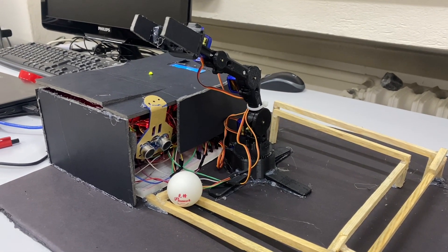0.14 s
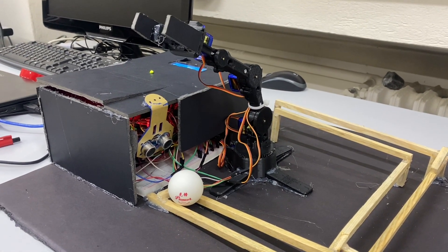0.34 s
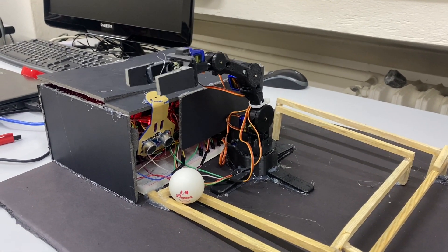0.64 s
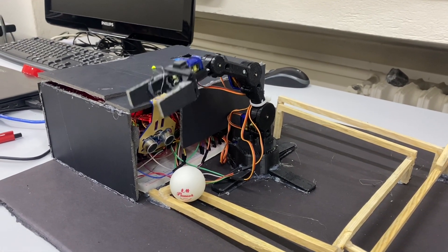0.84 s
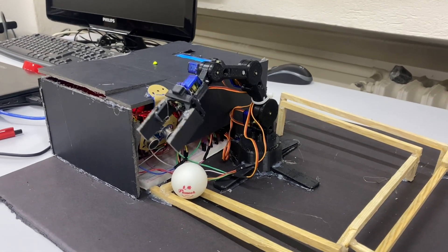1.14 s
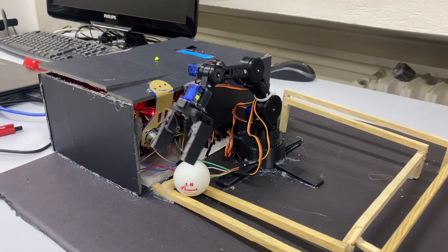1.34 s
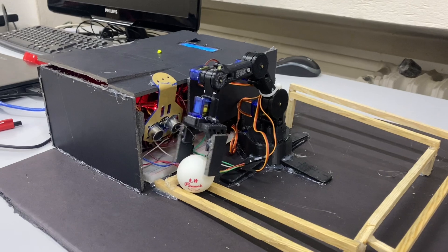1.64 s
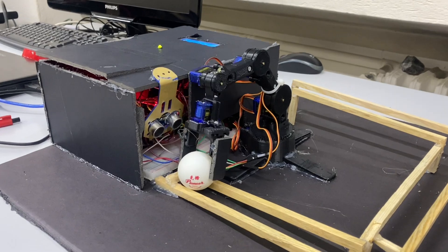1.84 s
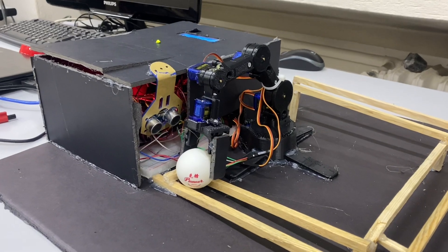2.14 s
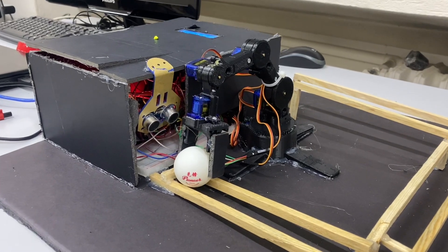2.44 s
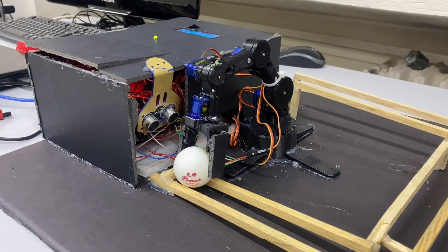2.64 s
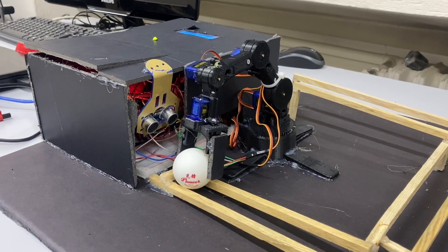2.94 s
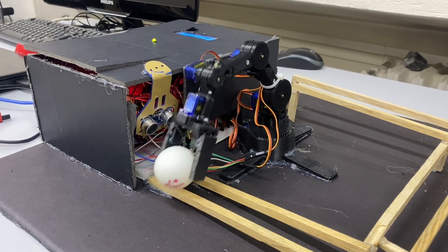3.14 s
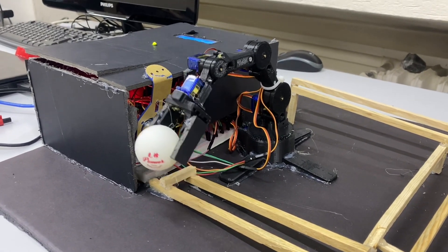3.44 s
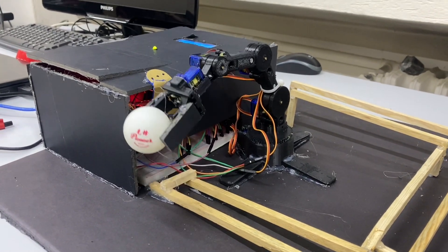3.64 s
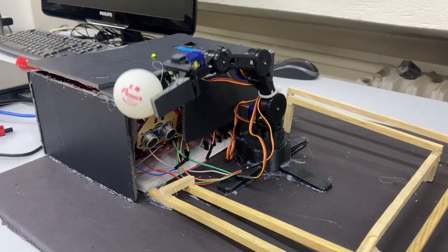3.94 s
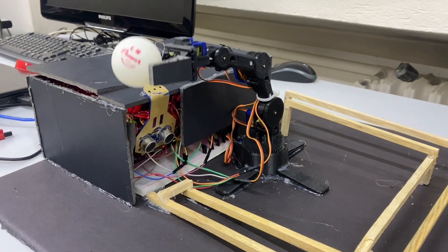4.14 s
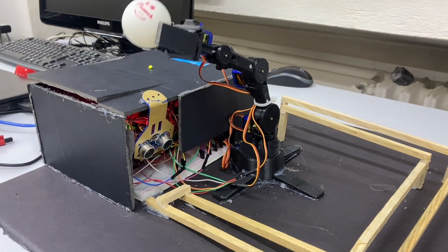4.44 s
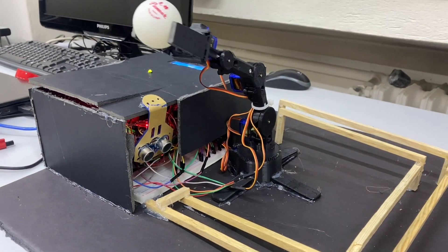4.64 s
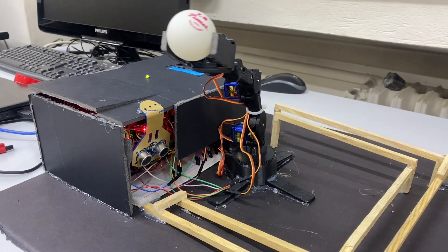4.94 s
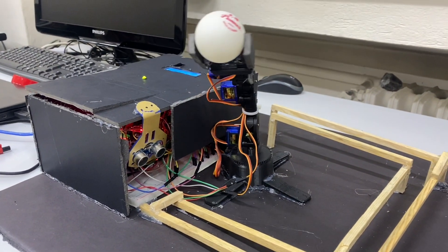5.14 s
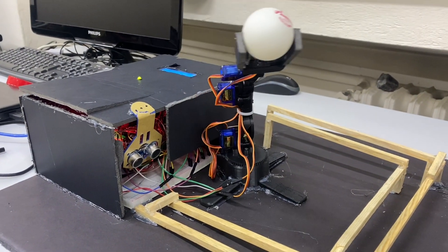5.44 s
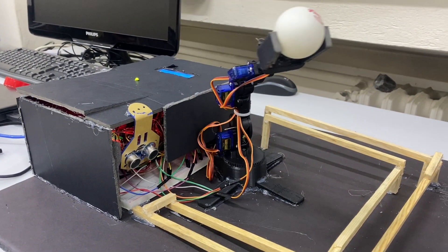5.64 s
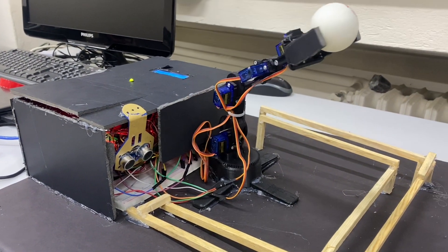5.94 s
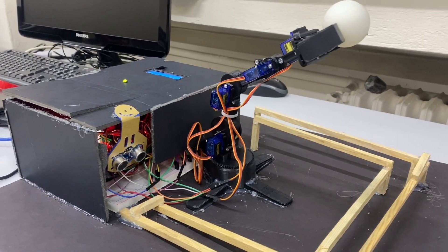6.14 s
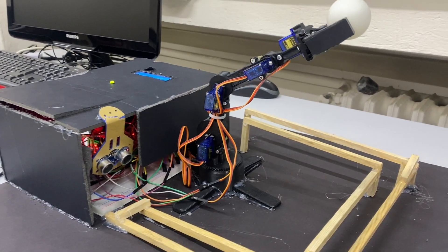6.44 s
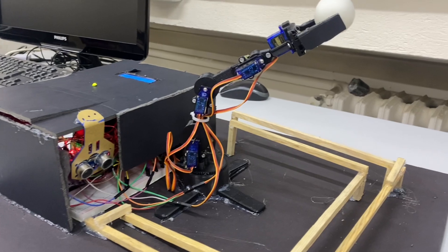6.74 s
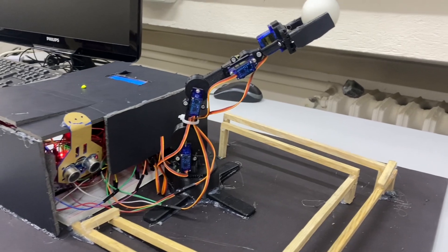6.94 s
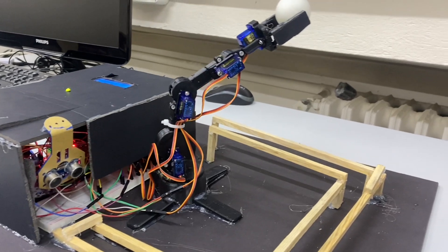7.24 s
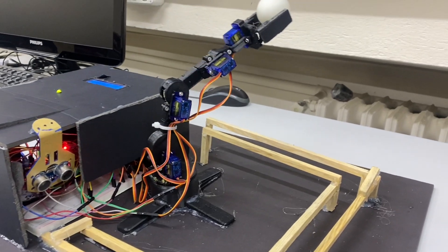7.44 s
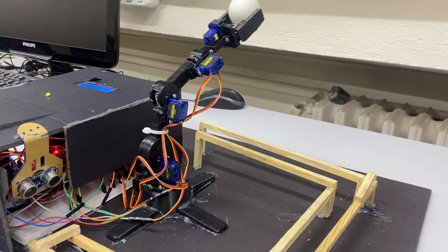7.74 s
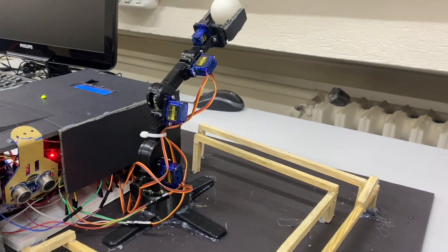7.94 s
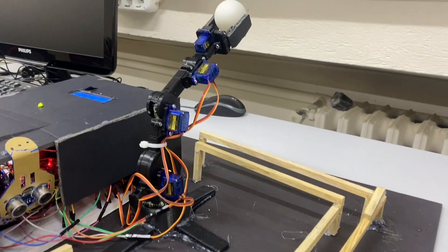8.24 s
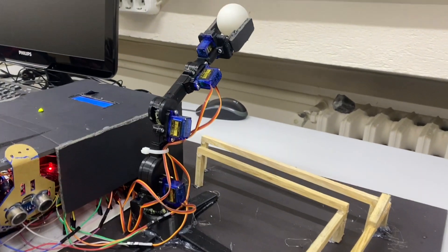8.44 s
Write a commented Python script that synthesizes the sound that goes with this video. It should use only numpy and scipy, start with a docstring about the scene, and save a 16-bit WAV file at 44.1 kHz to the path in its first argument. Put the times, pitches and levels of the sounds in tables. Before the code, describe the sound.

In a quiet room, close up, a small desktop robot arm moves. A brief geared whir stops, giving way to rapid, quiet chirring steps. A sharp click and tiny squeak mark the gripper closing on a table-tennis ball. After a near-silent pause come clicks and brighter, louder chirrs as it lifts, then a long, steady, rattling motor whir as the base turns.

```python
"""Small robot arm moving a ball

A small robot arm on a desk lowers itself, grips a table-tennis ball, lifts it and swings round.
The base servo whirs through rattling plastic gears, kicked 50 times a second by its driver.
The arm servos move in short chirring steps, with clicks, and the gripper's gears squeak on the ball.
The base board thuds softly; two close microphone ports listen in a quiet room."""
import sys
import numpy as np
from scipy import signal
from scipy.fft import rfft, irfft, next_fast_len
from scipy.io import wavfile
from scipy.ndimage import uniform_filter1d

SR = 44100
rng = np.random.default_rng(int(sys.argv[2]) if len(sys.argv) > 2 else 0)


def unload_audio(sound):
    """Save the sound as a 16-bit wav file, at the path given as the first command line argument."""
    columns = np.transpose(np.atleast_2d(sound))
    # keep every value between -1 and 1, then stretch to whole-number steps
    steps = np.round(np.clip(columns, -1, 1) * 32767)
    wavfile.write(sys.argv[1], SR, steps.astype(np.int16))


N = 378378
T = np.arange(N) / SR  # time of each sample, in seconds
SIZE = next_fast_len(N + SR)  # room for a second of tail when filtering
HZ = np.arange(SIZE // 2 + 1) * SR / SIZE
TOP_HZ = 15300  # highest frequency that is kept
SPIN_UP_S, SPIN_DOWN_S = 0.11, 0.023  # base servo

# swings of the base servo, back and then round: start_s, stop_s, level_db [s, s, dB]
SWINGS = [(-0.2, 0.251, -35), (4.455, 8.7, -36)]
# speed of the base motor: time_s, rotor_speed_hz [s, Hz]
ROTOR = [(0, 204.7), (.25, 202.3), (.36, 145), (4.45, 168.8), (4.7, 210.1), (5.3, 214.8), (6, 213.7),
         (6.7, 211), (7.4, 210), (8.55, 206.9)]
# motors holding the arm's weight: start_s, stop_s, level_db [s, s, dB]
HOLD = [(0.5, 1.88, -69.5), (3.12, 4.49, -64)]
# short steps of the arm servos, lowering and then lifting: time_s, level_db, length_s [s, dB, s]
STEPS = [(0.406, -58, 0.014), (0.413, -45.5, 0.033), (0.437, -46, 0.017), (0.455, -40.0, 0.008),
         (0.479, -45.5, 0.021), (0.518, -48, 0.02), (0.578, -57.5, 0.027), (0.643, -52.5, 0.02),
         (0.709, -58, 0.0081), (0.726, -58.5, 0.017), (0.785, -55.5, 0.026), (0.846, -52, 0.011),
         (0.86, -54, 0.0095), (0.88, -55.5, 0.051), (0.967, -50, 0.013), (1.03, -51.5, 0.029),
         (1.085, -55, 0.024), (1.155, -57.5, 0.032), (1.171, -53, 0.0068), (1.227, -48.0, 0.016),
         (1.29, -48.5, 0.019), (1.355, -50.5, 0.019), (1.401, -52, 0.021), (1.46, -57, 0.028),
         (1.525, -52.5, 0.031), (1.601, -49, 0.017), (1.671, -68, 0.0081), (2.936, -50.5, 0.021),
         (2.96, -52, 0.015), (3.032, -41.0, 0.0089), (3.055, -33, 0.011), (3.072, -40, 0.013),
         (3.086, -38.5, 0.0062), (3.114, -51.5, 0.021), (3.161, -50.5, 0.032), (3.21, -43.5, 0.013),
         (3.22, -41.5, 0.011), (3.28, -42.5, 0.018), (3.334, -48, 0.016), (3.367, -52.5, 0.022),
         (3.388, -42.5, 0.01), (3.409, -51, 0.017), (3.477, -43, 0.015), (3.534, -47, 0.015),
         (3.551, -47.5, 0.018), (3.597, -51, 0.024), (3.653, -41, 0.016), (3.717, -44, 0.016),
         (3.773, -47.5, 0.017), (3.833, -43, 0.013), (3.921, -47, 0.016), (3.974, -46.5, 0.016),
         (4.043, -45.0, 0.022), (4.109, -50.5, 0.023), (4.154, -49.5, 0.022), (4.218, -46, 0.018),
         (4.269, -46.5, 0.014), (4.36, -43.5, 0.012), (4.436, -51, 0.044)]
# resonances of the gripper case: pitch_hz, width_hz, level_db [Hz, Hz, dB]
GRIPPER = [(1500, 600, -28.5), (3000, 290, -13), (3700, 320, -11), (5100, 470, -14.5), (6200, 240, -6.5),
           (7020, 370, -9), (7800, 300, -7.5), (8700, 266, 1), (9520, 335, -5), (10360, 690, -3),
           (11300, 560, -3.5), (13250, 760, -8)]


def undb(db):
    """Decibels to gain."""
    return 10 ** (np.asarray(db) / 20)


def curves(rows):
    """The columns of a table, joined by straight lines in time."""
    s, *columns = np.transpose(rows)
    return [np.interp(T, s, column) for column in columns]


def during(rows):
    """One while a table lasts, with soft edges."""
    inside = (T >= rows[0][0]) & (T <= rows[-1][0])
    return uniform_filter1d(1. * inside, size=400)


def runs(rows, attack_s, release_s):
    """Gain of (start, stop, dB) rows: each rises, holds and dies away."""
    gain = np.zeros(N)
    for start, stop, db in rows:
        rise = 1 - np.exp(-np.maximum(T - start, 0) / attack_s)
        fall = np.exp(-np.maximum(T - stop, 0) / release_s)
        gain += undb(db) * rise * fall
    return gain


def walk(rate):
    """Random wander with a spread near one, turning at most this many times a second."""
    points = rng.standard_normal(8192)
    return np.interp(T * rate, np.arange(len(points)), points) * np.sqrt(3 / 2)


def add(out, s, sound):
    """Mix a sound in at a time."""
    i = int(s * SR)
    out[i:i + len(sound)] += sound


def resonances(modes, column=0):
    """Power response of steep-sided resonances; column picks which level to use."""
    return sum(undb(m[2 + column]) ** 2 / (1 + ((HZ - m[0]) / m[1]) ** 2) ** 2 for m in modes)


def slope(points):
    """Power response through (Hz, dB) points."""
    hz, db = np.transpose(points)
    return undb(np.interp(np.log(HZ + 1), np.log(hz), db)) ** 2


def ring(x, power):
    """Causal filter with this power response; white noise keeps its level."""
    # folding the cepstrum forward in time makes the filter respond only after each blow
    cepstrum = irfft(np.log(power / power.mean() + 1e-12) / 2, SIZE)
    cepstrum[1:SIZE // 2] *= 2
    cepstrum[SIZE // 2 + 1:] = 0
    response = np.exp(rfft(cepstrum))
    return irfft(rfft(x, SIZE) * response, SIZE)[:N]


def teeth(phase, rate, scatter_db, bunching):
    """Tiny impacts of gear teeth, uneven in size and bunched once a rotor turn."""
    chance = rate / SR * np.exp(bunching * np.cos(phase))
    struck = rng.random(N) < chance
    hits = struck * rng.choice([-1, 1], N) * undb(scatter_db * rng.standard_normal(N))
    return hits / hits.std()


def crack(db, hz, width, t60):
    """A brief burst of noise, dying by 60 dB in t60 seconds, heard through one resonance."""
    t = T[:SR // 4]
    b, a = signal.iirpeak(hz, hz / width, fs=SR)
    blow = rng.standard_normal(len(t)) * np.exp(-np.log(1000) * t / t60)
    sound = signal.lfilter(b, a, signal.lfilter(b, a, blow))
    return sound / np.abs(sound).max() * undb(db)


def room_air():
    """Spectrum of the still room: shaped noise with a thin, high hiss riding on the room air."""
    # still room: pitch_hz, level_db [Hz, dB per Hz]
    still = [(18, -27), (30, 0), (552, -15.5), (1030, -12), (3940, -12.5), (8530, -25), (10200, -17),
             (11500, -40), (15000, -64.5), (22000, -120)]
    hiss = slope(still) + resonances([(13560, 210, -4.0)])
    return rfft(ring(rng.standard_normal(N), hiss), SIZE) * undb(-73.5 - 5.5)


def room(x, early_db=-12, late_db=-13.5):
    """Spectrum of scattered echoes from the desk, then the room's tail, which loses its treble first."""
    # echo bands: pitch_hz, time_to_fall_60_db_s, level_db [Hz, s, dB]
    bands = [(150, 0.56, 0), (701, 1, -5.5), (1486, 0.72, 1), (2910, 0.66, -5.5), (5500, 0.45, 1),
             (8000, 0.54, -7.5), (11000, .2, -2), (15000, .15, -12.5)]
    t = T[:SR * 3 // 4]
    early_noise, late_noise = rng.standard_normal((2, len(t)))
    hz = np.fft.rfftfreq(len(t), 1 / SR)
    place = np.interp(hz, [band[0] for band in bands], np.arange(len(bands)))
    late = np.zeros(len(t))
    for k, (_, t60, db) in enumerate(bands):
        part = irfft(rfft(late_noise) * np.maximum(1 - np.abs(place - k), 0), len(t))
        late += part * undb(db) * np.exp(-np.log(1000) * t / t60)
    late *= t > .008
    early = early_noise * np.exp(-t / 0.0033) * (t > .001)
    early = signal.lfilter(*signal.butter(2, 700, "high", fs=SR), early)  # small things scatter no bass
    response = undb(early_db) * early / np.linalg.norm(early)
    response += undb(late_db) * late / np.linalg.norm(late)
    return rfft(x, SIZE) * rfft(response, SIZE)


def rubbing():
    """Uneven stick and slip as the arm comes down and settles, perhaps a cable dragging along the box."""
    # rubs: start_s, stop_s, level_db [s, s, dB]
    rubs = [(1.03, 1.14, -59.5), (1.225, 1.37, -61.5), (1.41, 1.52, -67), (2.31, 2.58, -77)]
    # resonances that the rubbing rings: pitch_hz, width_hz, level_db [Hz, Hz, dB]
    modes = [(245.5, 13, 10), (580, 75, -1.5), (942, 540, -3.5), (1350, 250, -9), (2240, 290, -5.5),
             (4000, 1200, -10)]
    phase = 2 * np.pi * np.cumsum(120 * (1 + 0.18 * walk(40))) / SR
    slips = teeth(phase, rate=2100, scatter_db=0.5, bunching=0.72)
    return ring(slips, resonances(modes)) * runs(rubs, attack_s=0.0076, release_s=0.041)


def board(high_hz=330, low_hz=58, fall_s=0.01174, peak_s=0.023, scatter=0.101):
    """Bending waves carry higher tones faster, so each thud falls in pitch; moving parts add a rumble."""
    # soft thuds in the base board: time_s, peak_level_db [s, dB]
    thud_rows = [(0.797, -63), (1.217, -56), (1.398, -50.5), (1.706, -63.5), (1.961, -54.5), (2.162, -65.5),
                 (2.333, -63), (3.835, -61), (4.155, -56), (4.459, -59), (4.667, -54), (4.709, -55),
                 (4.751, -53), (5.659, -61), (6.535, -56), (7.167, -55), (7.518, -59)]
    # shudders as the arm shifts its weight: start_s, stop_s, level_db [s, s, dB]
    shudders = [(1.04, 1.25, -67), (2.92, 3.2, -68.5), (3.7, 3.87, -69), (4.15, 4.32, -71.5),
                (4.64, 4.82, -63.5), (4.85, 5.03, -60), (8.2, 8.35, -64)]
    # colour of the rumble: pitch_hz, level_db [Hz, dB]
    colour = [(25, -16), (55, 1.5), (80, 2.5), (130, -1), (220, 1.5), (340, -1), (700, -2), (1500, -13),
              (4000, -26.5)]
    swing_db, hold_db, jolt_db = -34, -10.5, -9.5  # rumble relative to swings, holding motors and thuds
    rest_db = -79.5  # rumble with the arm at rest
    t = T[:SR // 4]
    swell = t / peak_s * np.exp((1 - (t / peak_s) ** 2) / 2)
    thuds, jolts = np.zeros(N), np.zeros(N)
    # each thud takes its own path through the board
    paths = np.exp(scatter * rng.standard_normal(len(thud_rows)))
    for (s, db), path in zip(thud_rows, paths):
        phase = 2 * np.pi * np.cumsum(low_hz + high_hz * np.exp(-t / (fall_s * path))) / SR
        add(thuds, s, undb(db) * swell * np.sin(phase))
        add(jolts, s, undb(db + jolt_db) * swell)
    motors = undb(swing_db) * runs(SWINGS, SPIN_UP_S, SPIN_DOWN_S)
    motors += undb(hold_db) * runs(HOLD, attack_s=0.0087, release_s=0.31)
    shifting = runs(shudders, attack_s=0.0017, release_s=0.043)
    shake = np.sqrt(motors ** 2 + jolts ** 2 + shifting ** 2 + undb(rest_db) ** 2)
    return thuds + shake * ring(rng.standard_normal(N), slope(colour))


def clicks():
    """Slack taken up in a gear or joint, and the ticking of the closing fingers' gears."""
    # clicks: time_s, peak_level_db, pitch_hz, width_hz, time_to_fall_60_db_s [s, dB, Hz, Hz, s]
    click_rows = [(0.408, -37, 9800, 8000, 0.014), (0.4505, -39, 9900, 8060, 0.012),
                  (0.4555, -37, 9900, 8060, 0.011), (.793, -39, 9000, 7030, .02),
                  (.841, -43, 9000, 7000, .03), (.962, -46, 9000, 7000, .02),
                  (1.219, -43, 9000, 7000, 0.032), (1.288, -40, 9000, 7000, .02),
                  (1.91, -24, 8440, 6040, 0.014), (1.974, -46.5, 1096, 2500, 0.06),
                  (1.9884, -41, 1900, 2500, 0.013), (1.995, -31, 6880, 4120, .015),
                  (2.149, -57, 1150, 900, 0.072), (2.339, -62, 504, 605, 0.054),
                  (2.716, -63, 4030, 700, .05), (2.759, -66, 3760, 3000, .05),
                  (2.897, -61, 3950, 500, 0.052), (2.92, -45.5, 3700, 1510, 0.28),
                  (2.995, -52.5, 1200, 900, 0.034), (3.024, -33, 7740, 4000, 0.033),
                  (3.049, -29, 8500, 7000, .02), (3.178, -27.5, 4500, 8550, 0.012),
                  (4.157, -51, 395.5, 350.3, .04), (3.325, -52, 8010, 7000, .03),
                  (3.529, -50, 8000, 6980, .03), (3.644, -45, 8000, 7000, 0.028),
                  (3.762, -49, 8030, 7010, .03), (3.825, -44, 8050, 7000, .03),
                  (3.963, -50, 7990, 7000, .03), (4.208, -49, 8000, 7050, .03),
                  (4.348, -40, 8000, 8000, 0.047), (4.476, -34, 2593, 4000, 0.033),
                  (4.494, -36, 2580, 3970, 0.017), (5.511, -38.5, 490, 130, 0.05),
                  (5.514, -39, 695, 200, 0.036)]
    # ticks of the fingers' gears: time_s [s]
    tick_times = [1.478, 1.566, 1.638, 1.68, 1.737, 1.801, 1.857, 1.879]
    out = np.zeros(N)
    for s, db, hz, width, t60 in click_rows:
        add(out, s, crack(db, hz, width, t60))
    for s in tick_times:
        add(out, s, crack(db=-53, hz=3896, width=340, t60=0.038))
    return out


def holding(step_db=5, step_s=0.022):
    """The loaded motors keep trembling and ring the arm's links, harder at every step."""
    # resonances of the arm's links: pitch_hz, width_hz, level_db [Hz, Hz, dB]
    links = [(818, 65, -0.5), (1071, 106, -9), (1935, 80, -5.5), (3270, 500, -14), (4000, 750, -7.5),
             (7160, 2800, -12.5), (10400, 1300, -17.5)]
    phase = 2 * np.pi * np.cumsum(400 * (1 + 0.28 * walk(30))) / SR
    stepping = np.zeros(N)
    strain = np.exp(-((T[:SR // 5] - .1) / step_s) ** 2)  # peaks 0.1 s in, so it is added 0.1 s early
    for s, *_ in STEPS:
        add(stepping, s - .1, strain)
    tremble = teeth(phase, rate=4200, scatter_db=0.5, bunching=.8)
    tremble = tremble * undb(2.8 * walk(35) + step_db * stepping)
    return ring(tremble, resonances(links)) * runs(HOLD, attack_s=0.19, release_s=0.049)


def squeak(flutter_db=3, count=10):
    """The gripper's gears squeal: pitch follows the closing speed and falls as the ball stalls the motor."""
    # fingers closing on the ball: time_s, tooth_rate_hz, level_db, load_share [s, Hz, dB, 0-1]
    closing = [(1.915, 1150, -54.5, .2), (1.94, 1525, -42, .2), (1.957, 1750, -39.5, .1),
               (1.968, 1706, -37.5, .15), (1.975, 1458, -33, .7), (1.985, 1310, -35.5, 0.7),
               (1.995, 1100, -38, 0.9), (2.002, 1065, -46.5, 0.7), (2.018, 990, -58.5, .5)]
    hz, db, load = curves(closing)
    slip = .025 * walk(1500)  # the teeth catch unevenly, which makes the squeal a scrape
    phase = 2 * np.pi * np.cumsum(hz * (1 + slip)) / SR
    partials = np.zeros(N)
    for k in range(2, count + 1):
        strength = load if k % 2 else 1  # load brings out the odd harmonics
        tone = np.sin(k * phase + rng.uniform(0, 2 * np.pi))
        partials += strength * (k * hz < TOP_HZ) * tone * undb(flutter_db * walk(200))
    return ring(partials / 2 * undb(db) * during(closing), resonances(GRIPPER))


def stepping_servo(steps, power, stall_hz, run_hz, bunching, whine,
                   rise=0.54, coast=1.0, inertia_s=0.0078, judder_db=2.5):
    """Each step starts abruptly and coasts down; gears judder, and chirr louder and higher with speed."""
    push, loudness = np.zeros(N), np.zeros(N)
    for s, db, length_s in steps:
        near = slice(max(int((s - .15) * SR), 0), int((s + .15) * SR))
        t = (T[near] - s) / length_s
        start = np.exp(-np.abs(t / rise) ** 2.6)
        coasting = 1 / (1 + (t / coast) ** 2) ** 2.5
        swell = np.where(t < 0, start, coasting)
        push[near] += np.sqrt(swell)
        loudness[near] += swell * undb(db) ** 2
    lag = np.exp(-1 / (inertia_s * SR))  # the rotor's inertia smooths its speed
    speed = signal.lfilter([1 - lag], [1, -lag], np.tanh(push))
    phase = 2 * np.pi * np.cumsum(stall_hz + run_hz * speed) / SR
    # tooth mesh: a bright buzz of many rotor harmonics
    mesh = np.cos(12 * np.sin(phase) + 5 * np.sin(2 * phase + 1))
    gears = teeth(phase, rate=11000, scatter_db=2.0, bunching=bunching) + whine * mesh / mesh.std()
    level = np.sqrt(loudness / (1 + whine ** 2))
    return ring(gears * level * undb(judder_db * walk(220)), power)


def arm_servos():
    """Servos lowering, gripping and lifting, each ringing its own case."""
    # resonances of the arm servo cases: pitch_hz, width_hz, lowering_db, lifting_db [Hz, Hz, dB, dB]
    elbow = [(1910, 100, -25.5, -12), (3207, 237, -12, -4), (3750, 830, -10.5, -10), (5020, 1060, -14, -12),
             (6660, 1200, -12, -10), (7290, 270, -5, -5), (7980, 460, -2.5, 2.5), (9350, 440, -9.5, -4.5),
             (9940, 350, -1.5, -1.5), (11220, 1250, -5, -7), (13100, 630, -14, -13.5),
             (14350, 890, -9.5, -16.5)]
    # pushes of the gripper servo: time_s, level_db, length_s [s, dB, s]
    pushes = [(1.91, -40.5, .006), (1.923, -37, .012), (1.94, -42, .014), (1.96, -37, .014),
              (1.975, -36, 0.0084), (1.991, -33, 0.011), (2.013, -42, .008)]
    lift_from_s = 2.5  # the arm lowers before this and lifts after it
    lowering = [row for row in STEPS if row[0] < lift_from_s]
    lifting = [row for row in STEPS if row[0] >= lift_from_s]
    down = stepping_servo(lowering, resonances(elbow, column=0),
                          stall_hz=246.6, run_hz=631, bunching=1.2, whine=0.3)
    up = stepping_servo(lifting, resonances(elbow, column=1),
                        stall_hz=240.8, run_hz=653, bunching=1.0, whine=0.24)
    grip = stepping_servo(pushes, resonances(GRIPPER),
                          stall_hz=246, run_hz=621, bunching=0.51, whine=0.31)
    return down + up + grip


def gear_whine(push, kick=0.022, flutter_db=2.5):
    """A meshing gear pair sings at a fixed ratio to the rotor, sagging with it."""
    # whine during the long swing: time_s, mesh_tone_db, its_octave_db [s, dB, dB]
    mesh = [(4.55, -56.5, -58), (5.3, -64, -46.5), (6.2, -56, -47), (7, -75, -45), (8.6, -73, -43.5)]
    mesh_ratio = 4.33  # tooth contacts per rotor turn
    slack = .013 * walk(300)  # slack between the teeth roughens the tone
    phase = 2 * np.pi * np.cumsum(mesh_ratio * curves(ROTOR)[0] * (1 + kick * push + slack)) / SR
    tone = np.zeros(N)
    for k, db in enumerate(curves(mesh)):
        tone += undb(db + flutter_db * walk(110)) * np.sin((k + 1) * phase)
    return tone * during(mesh)


def flicker(x, depth_db=1.04, rate=28, count=14):
    """The whir's loudness wavers at random, separately in fourteen overlapping pitch bands."""
    # overlapping bands, evenly spaced in pitch from 1 to 11 kHz
    place = np.clip(np.log(HZ / 1000 + 1e-9) / np.log(11), 0, 1) * (count - 1)
    spectrum = rfft(x, SIZE)
    out = np.zeros(N)
    for k in range(count):
        band = irfft(spectrum * np.maximum(1 - np.abs(place - k), 0), SIZE)[:N]
        out += band * undb(depth_db * walk(rate))
    return out


def base_drive(push, throb_db=-0.6, flutter_db=0.45, kick=0.0812):
    """The rotor speeds up at each pulse and coasts between: whine with 50 Hz sidebands over gear rattle."""
    # whine of the three-pole rotor: multiple_of_rotor_speed, level_db [times, dB]
    partials = [(3, -6.5), (4, -6.5), (6, -1.5), (9, -11), (12, -8), (15, -8.5), (16, -5), (18, -10),
                (21, -12)]
    unsteady = .006 * walk(120) + .004 * walk(25) + .004 * walk(7)  # the load varies as the gears turn
    phase = 2 * np.pi * np.cumsum(curves(ROTOR)[0] * (1 + kick * push + unsteady)) / SR
    whine = np.zeros(N)
    for k, db in partials:
        whine += undb(db) * np.cos(round(k) * phase + rng.uniform(0, 2 * np.pi))
    rattle = teeth(phase, rate=5000, scatter_db=3.0, bunching=.19)
    rattle = rattle * undb(0.87 * np.cos(2 * phase) + 0.5 * np.cos(3 * phase))
    rattle = rattle * undb(2.5 * np.cos(6 * phase))  # the brushes cross six commutator gaps a turn
    # small teeth rattle above the whine
    rattle = signal.lfilter(*signal.butter(1, 750, "high", fs=SR), rattle)
    throb = undb(throb_db * push * .5 + flutter_db * walk(70))
    return flicker(0.23 * whine + 0.87 * rattle) * throb


def base_servo():
    """The case radiates the drive; other, brighter resonances face the listener as the arm turns."""
    # base gear case: pitch_hz, width_hz, back_db, setting_out_db, halfway_db, turned_round_db
    # [Hz, Hz, dB, dB, dB, dB]
    case = [(625, 46, -13, -11, -19, -24.5), (791, 57, -25, -12, -14.5, -22),
            (953, 110, -13, -10, -11, -19), (1150, 120, -13, -15, -11, -3), (1266, 85, -22, -3.5, -5, -5.5),
            (1540, 160, -2, -7, -8.5, -11), (1756, 135, -4.5, -9, -8.5, 3.5),
            (1967, 150, -2, -5.5, -5, -11.5), (2342, 146, -8, -9, -10, -9),
            (2667, 99, -7, -4.5, -3.5, -6.5), (2792, 65, 0.5, 1, -6.5, -12.5),
            (3070, 130, -3, -4.5, -10.5, -5), (3360, 300, 0, -2, -1.5, -0.5),
            (3744, 250, -2, -11, -7, -7.5), (4400, 330, -6.5, -1, -4.5, -6), (5070, 194, -3, -10, -5, -11),
            (5590, 580, -8.5, -14.5, -8, 1.5), (5830, 62, -20, -13, -3, -4),
            (6640, 470, -8.5, -9, -2, -7.5), (6900, 120, -6, -12, -22, -3), (7540, 280, -9.5, -14, -19, -3),
            (8120, 310, -6.5, -4.5, -9, -19), (9100, 810, -9, -10.5, -7.5, -6),
            (10020, 410, -10, -12, -15, -1), (10960, 790, -12.5, -13, -18, -10.5),
            (12650, 590, -22, -21, -17.5, -17.5)]
    # heading of the arm: time_s, share_of_the_way_round [s, 0-1]
    heading = [(4.5, 0.08), (5.5, 0), (6.1, 0.19), (6.85, 0.49), (7.5, 0.72), (8.0, 0.86), (8.5, 0.96)]
    # low tones during the long swing: time_s, level_db [s, dB]
    low_tones = [(4.6, -2.5), (5.65, 3), (6.1, -11), (6.7, -5.5), (7.5, 7), (7.88, 12), (8.05, 2.5),
                 (8.4, 12.5)]
    turned_db = 2.5  # gain once the arm has turned round
    frame = 2 * np.pi * 50 * T  # the driver's 50 pulses a second
    push = np.sin(frame) + np.sin(2 * frame) / 2 + np.sin(3 * frame) / 2
    drive = base_drive(push)
    bass_cut = 1 + (540 / (HZ + 1)) ** 16
    back, *sides = (ring(drive, resonances(case, column=k) / bass_cut) for k in range(4))
    turned = np.clip(curves(heading)[0] + 0.018 * walk(7.1), 0, 1)  # the arm sways as it goes
    # fade between the three sides as the arm turns
    turning = sum(side * np.maximum(1 - np.abs(2 * turned - k), 0) for k, side in enumerate(sides))
    turning = turning * undb(turned_db * turned)
    bass = signal.sosfiltfilt(signal.butter(6, 750, fs=SR, output="sos"), turning)
    turning = turning + (undb(curves(low_tones)[0]) - 1) * bass
    out = gear_whine(push)
    for swing, sound in zip(SWINGS, (back, turning)):
        out = out + sound * runs([swing], SPIN_UP_S, SPIN_DOWN_S)
    return out


def scene():
    """Sources reach two ports; echoes and air differ between them, least in the bass and high treble."""
    # the two ports: pitch_hz, left_leads_rad, left_minus_right_db [Hz, rad, dB]
    ports = [(100, 0.5, 1), (610, 0, 2), (1180, 1.5, 5.5), (1660, 0, 3), (2450, 0.96, 1), (3300, 1.26, 2.5),
             (4600, 1.3, 2.5), (6200, 1, 0.5), (6980, -1, 3), (7940, -2, -3), (8120, -2.5, 2.5),
             (9570, -6, -2), (10050, -6.5, 0.5), (13000, -11, -0.5), (13600, -13, 0.5), (15040, -7.5, -2.5)]
    dry = rubbing() + board() + clicks() + holding() + squeak() + arm_servos() + base_servo()
    shared, apart = (room(dry) + room_air() for _ in range(2))
    # how far the ports differ: (Hz, dB)
    spread = np.sqrt(slope([(100, -7.5), (600, 0.0), (1500, 1.0), (5500, -8.5), (9000, -6.5), (14000, -8)]))
    hz, lead, balance_db = np.transpose(ports)
    port = undb(np.interp(HZ, hz, balance_db) / 2)
    lag = np.exp(-1j * np.interp(HZ, hz, lead))
    common = rfft(dry, SIZE) + shared / np.sqrt(2)
    left = (common + spread * apart) * port
    right = (common - spread * apart) / port * lag
    return undb(-0.5) * irfft(np.array([left, right]), SIZE)[:, :N]


def record(dry):
    """The recorder cuts the top."""
    return signal.sosfilt(signal.ellip(8, .2, 70, TOP_HZ, fs=SR, output="sos"), dry)


dry = scene()
out = record(dry)
unload_audio(out)
```